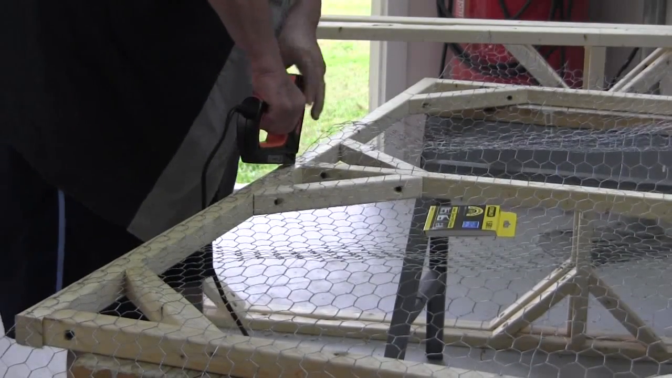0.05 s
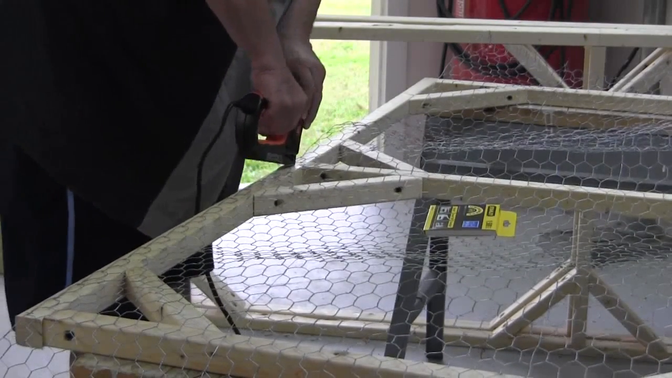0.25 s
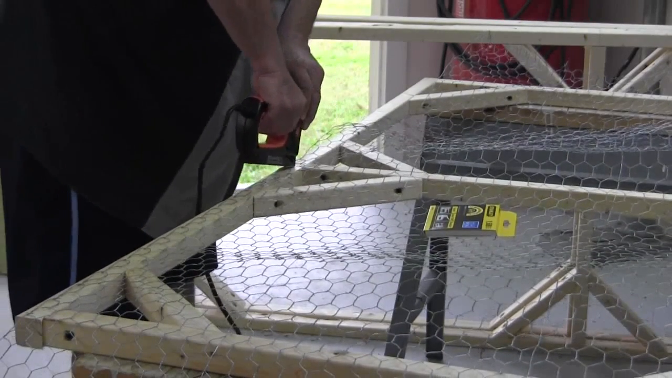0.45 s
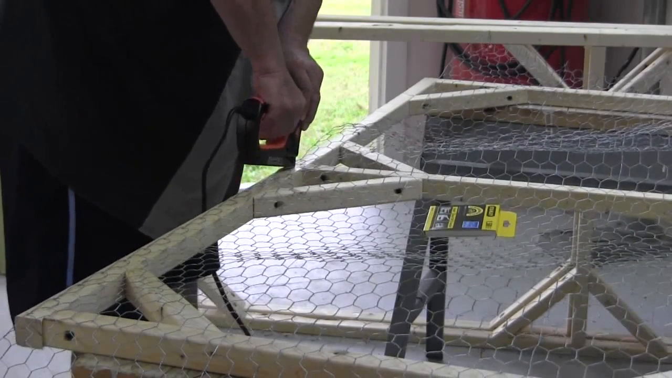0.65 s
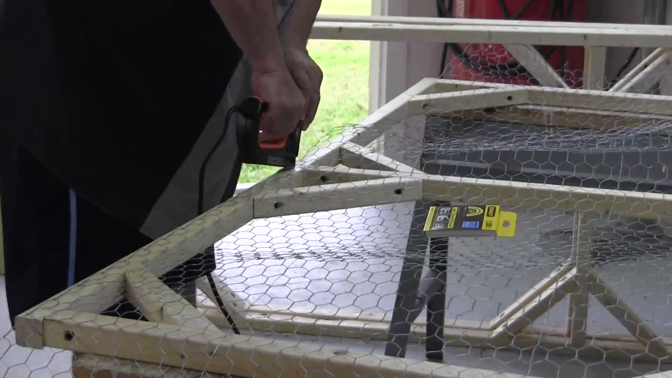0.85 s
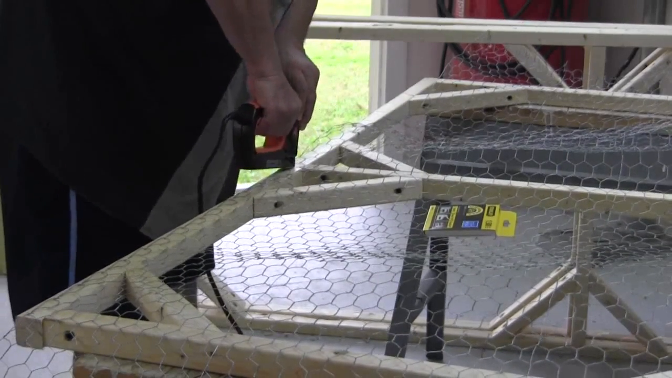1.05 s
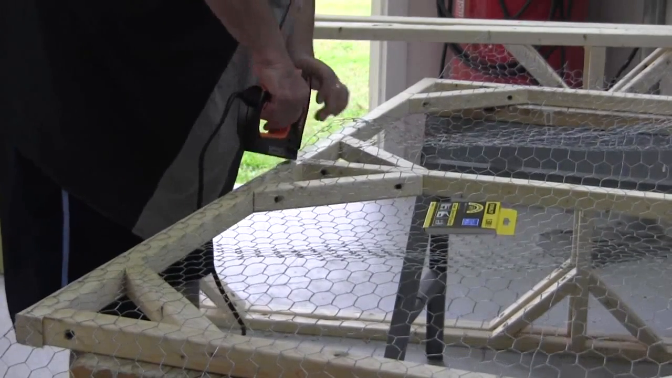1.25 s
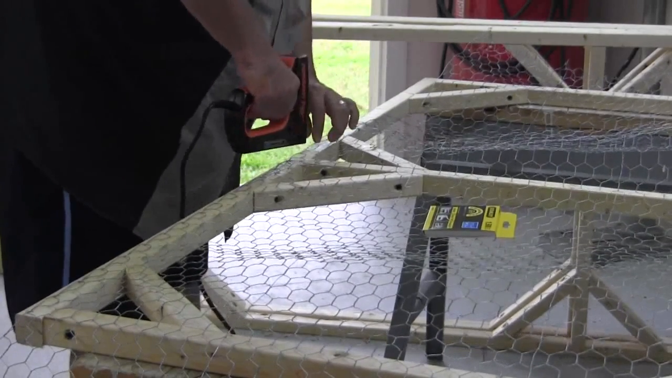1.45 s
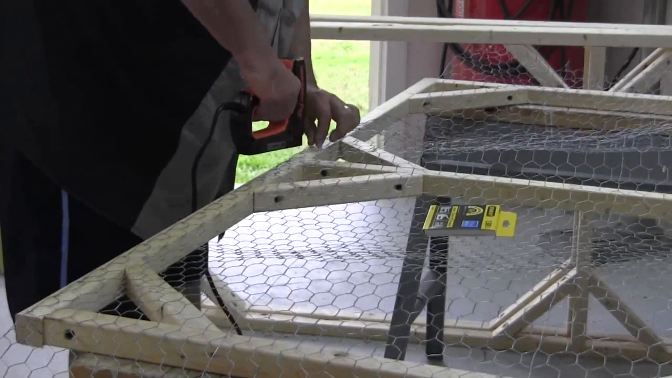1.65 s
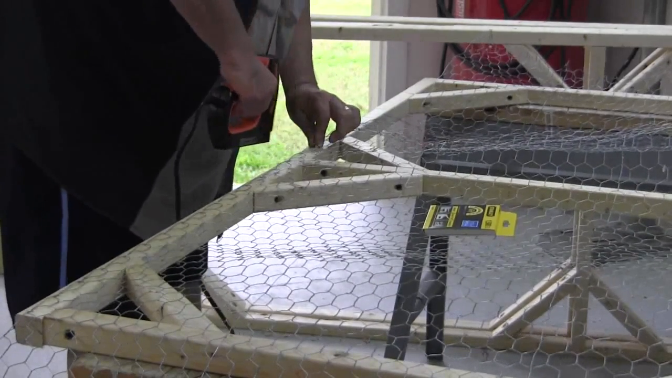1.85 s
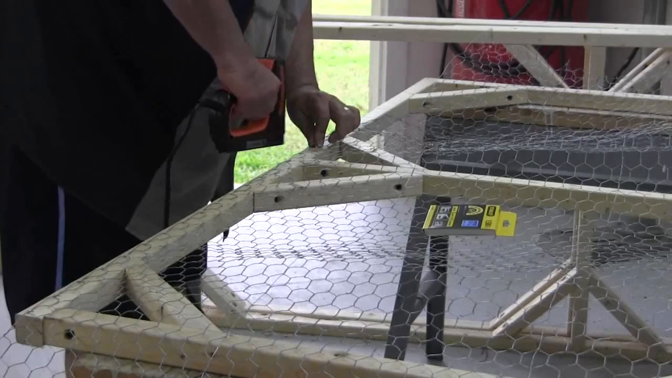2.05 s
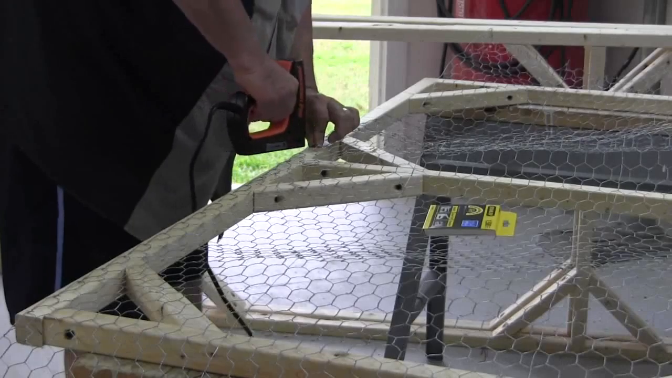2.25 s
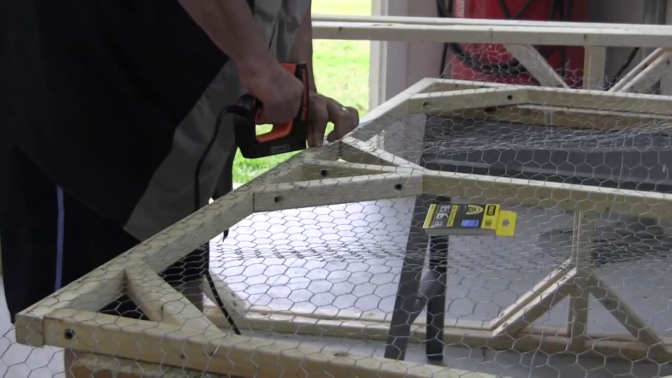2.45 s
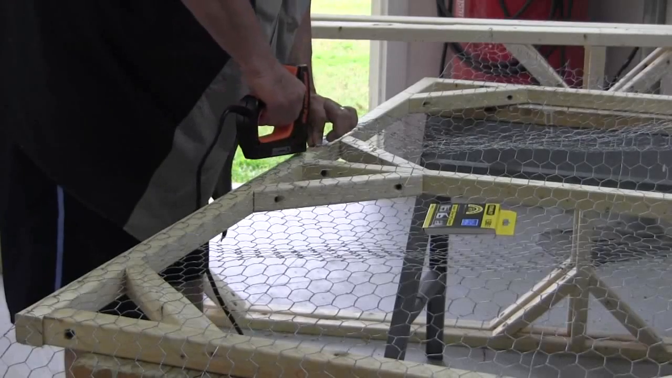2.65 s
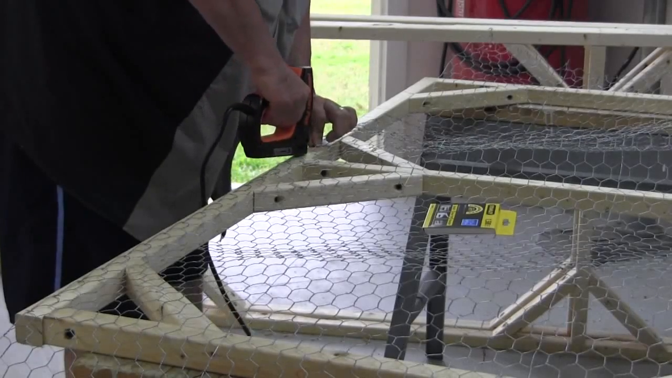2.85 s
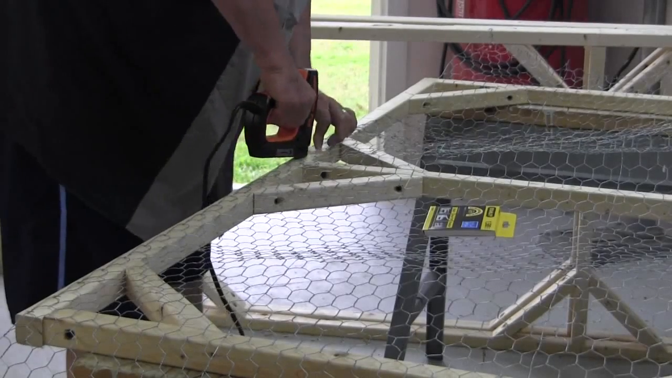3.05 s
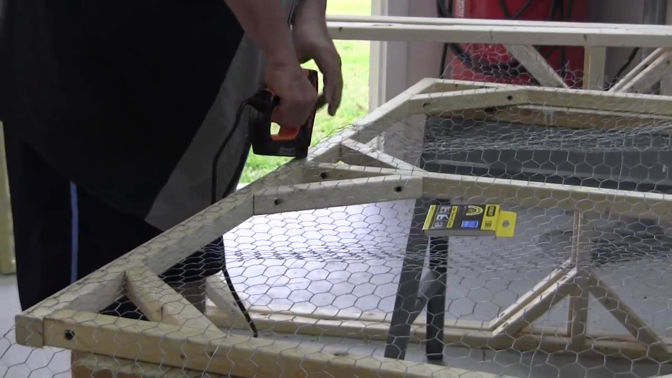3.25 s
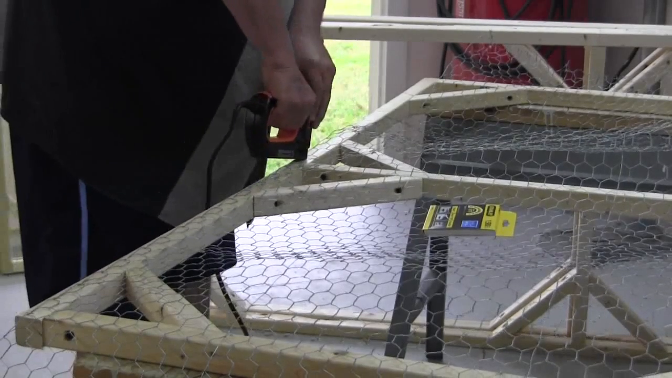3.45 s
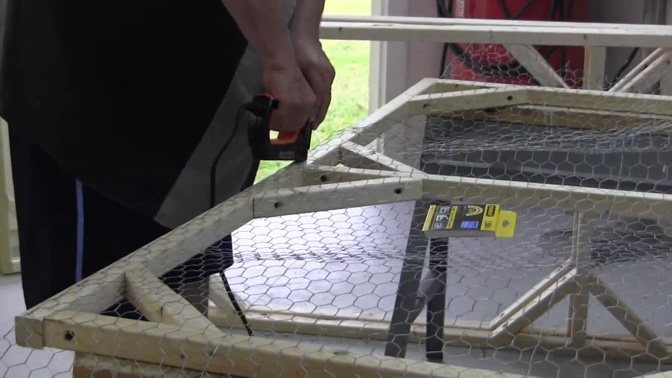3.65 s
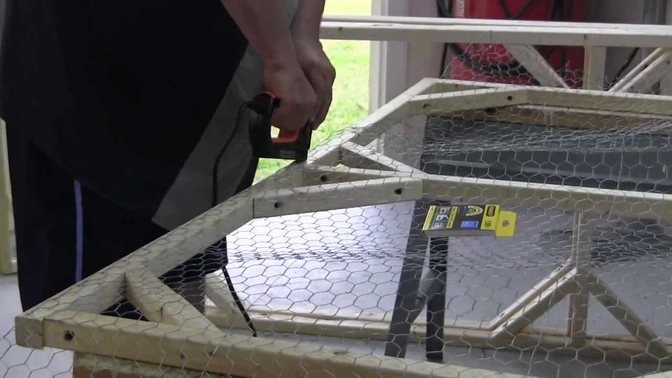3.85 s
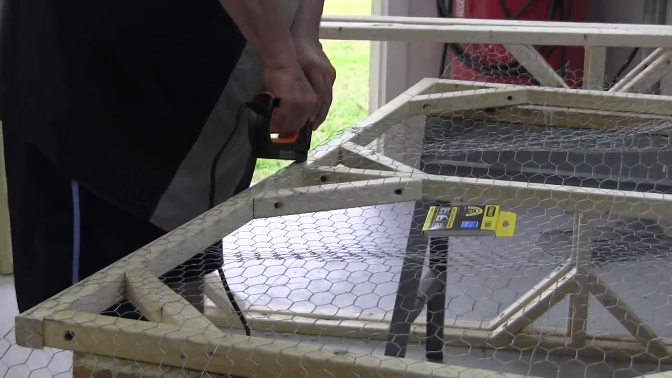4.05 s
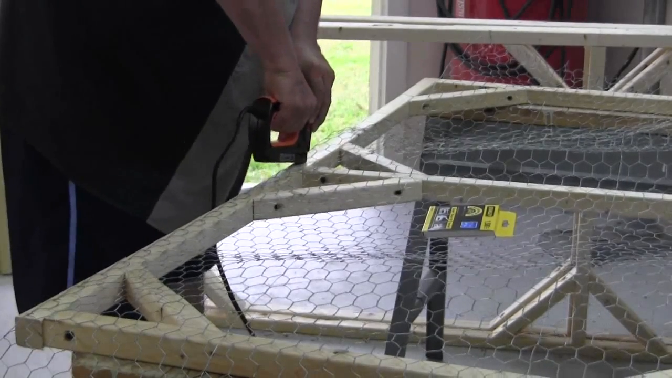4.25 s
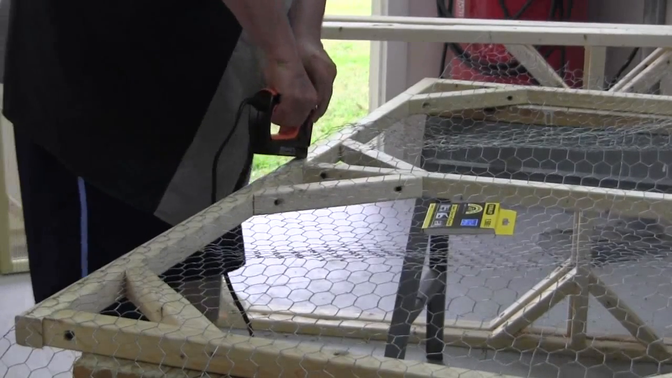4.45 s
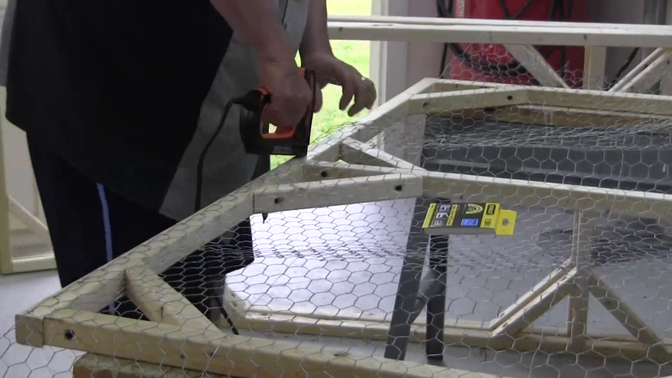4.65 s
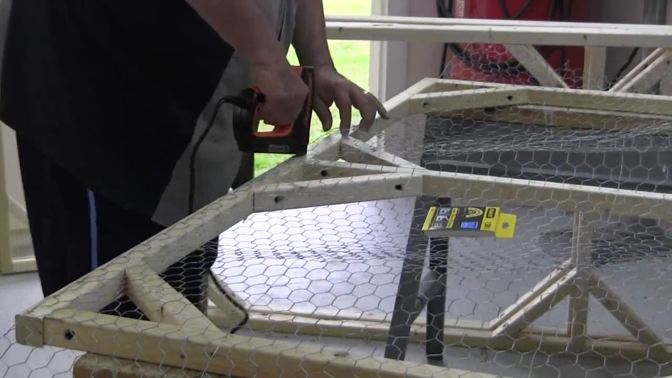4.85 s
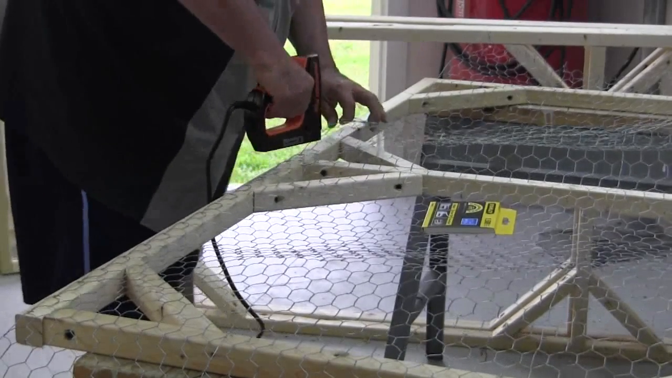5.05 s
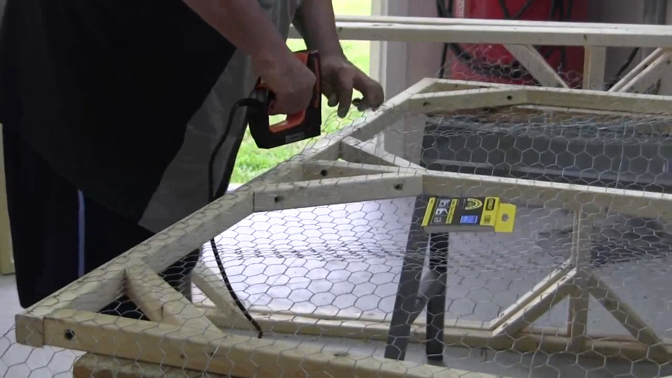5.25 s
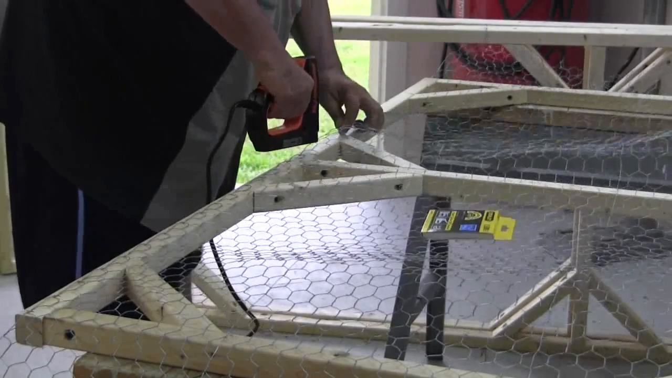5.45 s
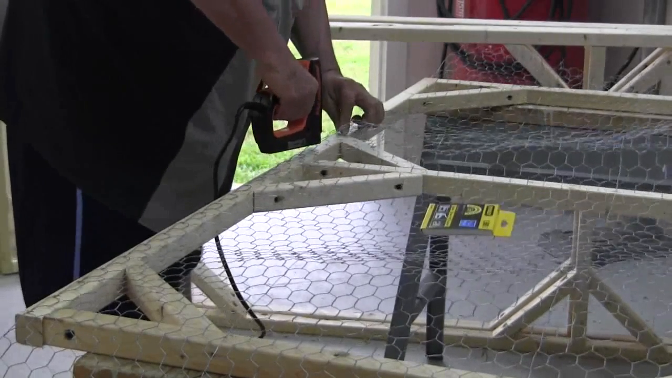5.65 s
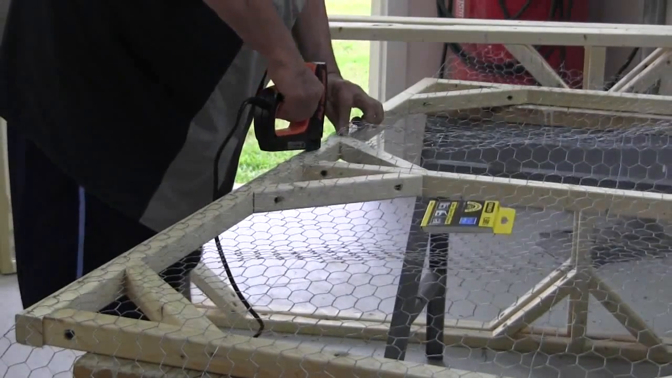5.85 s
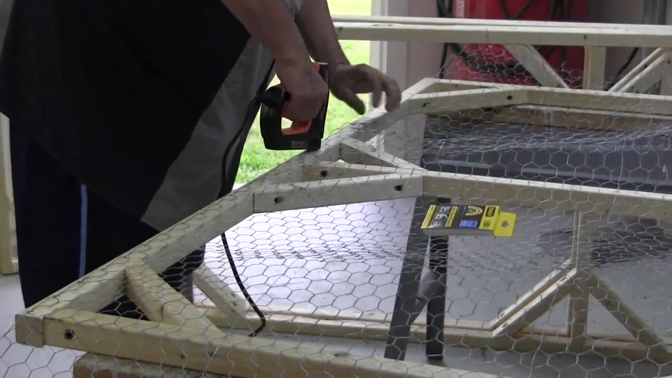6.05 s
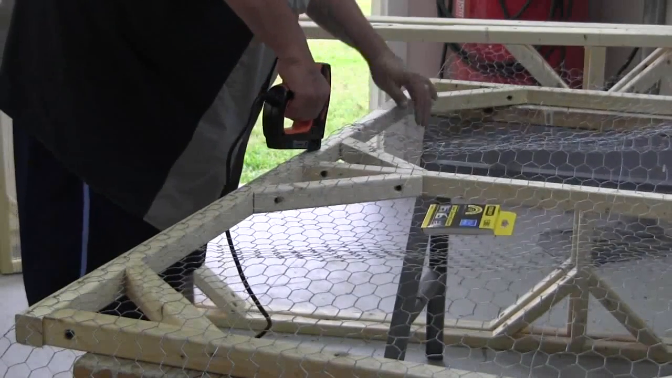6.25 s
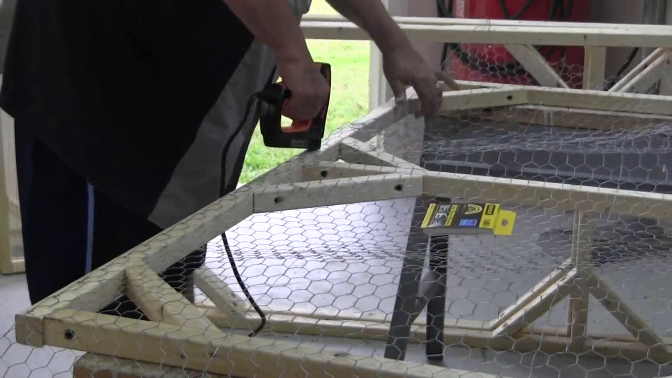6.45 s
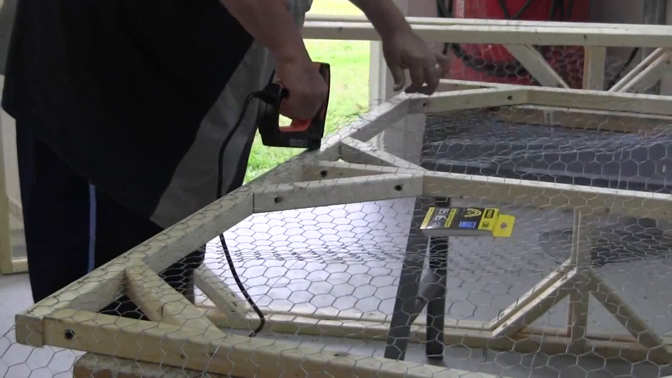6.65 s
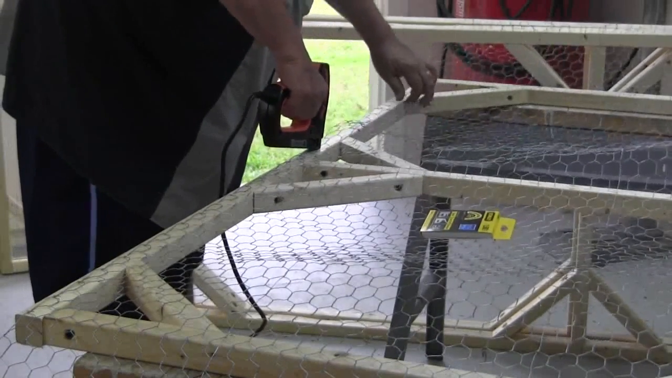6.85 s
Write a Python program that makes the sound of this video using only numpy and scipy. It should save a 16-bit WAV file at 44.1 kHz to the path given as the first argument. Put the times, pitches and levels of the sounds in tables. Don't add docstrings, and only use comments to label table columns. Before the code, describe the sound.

Electric staple gun slams two staples into a mesh-covered wooden frame in an echoing garage, with bumps, wire rubbing and creaks between.

```python
import sys
import numpy as np
from scipy import signal
from scipy.fft import rfft, irfft
from scipy.io import wavfile
from scipy.ndimage import uniform_filter1d

SR = 44100
rng = np.random.default_rng(int(sys.argv[2]) if len(sys.argv) > 2 else 0)


def to_wav(sig):
    pcm = np.clip(np.atleast_2d(sig), -1, 1) * 32767
    pcm = np.round(pcm).astype(np.int16)
    wavfile.write(sys.argv[1], SR, pcm.T)


def nominal_scale(level):
    x = np.asarray(level, float) / 20
    return 10 ** x


N = 305172


def read(points, hz):
    point_hz, value = np.transpose(points)
    return np.interp(np.log(hz + 1), np.log(point_hz + 1), value)


def evened(x):
    return x / np.sqrt(np.mean(x ** 2) + 1e-20)


def add(mix, start_s, sound):
    part = mix[..., round(start_s * SR):][..., :sound.shape[-1]]
    part += sound[..., :part.shape[-1]]


def coloured(x, gain):
    size = x.shape[-1]
    return irfft(rfft(x) * gain(np.fft.rfftfreq(size, 1 / SR)), size)


def hump(hz, centre_hz, octaves):
    return np.exp(-(np.log2((hz + 1) / centre_hz) / octaves) ** 2 / 2)


def ring(modes, size):
    t = np.arange(size) / SR
    return sum(nominal_scale(db - 60 * t / t60) * np.sin(2 * np.pi * hz * t) for hz, db, t60 in modes)


def field(frames, same_table):
    hz = np.fft.rfftfreq(512, 1 / SR)
    a, b, c, d = rng.standard_normal((frames, 257, 4)).T
    same = np.clip(read(same_table, hz), 0, 1)[:, None]
    alike = np.sqrt((1 + same) / 2) * (a + 1j * b)
    apart = np.sqrt((1 - same) / 2) * (c + 1j * d)
    return hz, np.array([alike + apart, alike - apart])


# pitch_hz, level_db per Hz
WASH = [(18, -46), (30, -14), (59, 0), (165, -3.5), (252, -9.5), (437, -15.5), (740, -11), (1130, -9),
        (2010, -15.5), (2680, -17.5), (3140, -23.5), (13300, -39.5), (16000, -39)]
# pitch_hz, left-right likeness (0-1)
WASH_LIKENESS = [(60, 1), (180, 0.96), (550, 0.79), (1650, 0.96), (4970, 0.64), (15000, 0.56)]


def traffic_wash():
    frames = N // 128 + 8
    hz, spectra = field(frames, WASH_LIKENESS)
    patches = uniform_filter1d(rng.standard_normal((frames, 257)).T, 6, 0)
    patches = evened(uniform_filter1d(patches, 30, 1))
    noise = signal.istft(spectra * nominal_scale(0.84 * patches), nperseg=512, noverlap=384)[1][:, :N]
    return nominal_scale(-47.5) * evened(coloured(noise, lambda hz: nominal_scale(read(WASH, hz))))


# pitch_hz, t60_s
GARAGE_DECAY = [(60, 0.96), (200, 0.64), (500, 0.51), (1500, 0.49), (4000, 0.44), (9000, 0.45),
                (15000, 0.32)]
# pitch_hz, left-right likeness (0-1)
ECHO_LIKENESS = [(60, 1), (240, 0.97), (950, 0.92), (3770, 0.81), (15000, 0.56)]


def garage(colour):
    hz, spectra = field(317, ECHO_LIKENESS)
    fall_db = -60 * np.arange(317) * 128 / SR / read(GARAGE_DECAY, hz)[:, None]
    linger = nominal_scale(-42.0 + 0.15 * fall_db) * np.sqrt(np.linspace(1, 0, 317))
    tail = signal.istft(spectra * (nominal_scale(fall_db) + linger), nperseg=512, noverlap=384)[1]
    size = tail.shape[1]
    tail = coloured(np.pad(tail, [(0, 0), (0, 57600 - size)]), colour)[:, :size]
    tail = tail * np.clip(np.arange(size) / SR / 0.0098, 0, 1)
    return tail / np.linalg.norm(tail[0])


# pitch_hz, width_hz, level_db
FRAME = [(155.6, 15, 8.5), (209.7, 35, 9), (281, 24, 5), (354.2, 4.4, 14), (431, 15, 5.5), (499, 6, 6),
         (559, 99, 2), (820, 39, 6), (1007, 6.2, -5), (1160, 20.4, 2.5), (1330, 15, 7)]


def woody(hz):
    return nominal_scale(sum(db / (1 + (2 * (hz - beam_hz) / width_hz) ** 2) for beam_hz, width_hz, db in FRAME))


def friction_clumps():
    return nominal_scale(1.6 * evened(uniform_filter1d(rng.standard_normal(N), 300)))


def friction(clumps, colour):
    return evened(coloured(rng.standard_normal(N) * clumps, colour))


def strokes(peak_s, level_db, swell_s, fade_s):
    grid = np.arange(0, N + 64, 64)
    late_s = grid[:, None] / SR - peak_s
    away = np.where(late_s < 0, -late_s / np.abs(swell_s), late_s / np.abs(fade_s))
    power = nominal_scale(level_db - 20 * away) ** 2
    return np.interp(np.arange(N), grid, np.sqrt(power.sum(1)))


# peak_s, scrape_db, hiss_db (cloth against scrape), swell_s, fade_s
RUBS = [(.002, -40, -10.5, 0.0033, 0.072), (.125, -55, -4, .05, .2), (.33, -52, -1.5, 0.43, 0.54),
        (.712, -52, -14, .12, 0.088), (1.09, -59, -18, .15, .05), (2.934, -44.5, -8.5, 0.024, 0.2),
        (3.36, -53.5, -13, 0.36, .3), (3.56, -59, 3, 0.32, 0.11), (3.6, -45, -7, 0.052, .2),
        (3.746, -44, -10.5, 0.31, 0.15), (4.136, -53.5, -5, .1, 0.21), (4.95, -30.5, -14.5, 0.27, 0.2),
        (5.312, -44, -6.5, 0.1, 0.27), (5.48, -54, -14, 0.41, 0.36), (5.622, -43, -7, 0.62, 0.093),
        (5.828, -50, -9, 0.27, 0.16), (6.0, -48.5, -7, .04, 0.13), (6.214, -38, -11, 0.0044, 0.22),
        (6.526, -51, -8, 0.17, .25), (6.77, -43.5, -7.5, 0.32, .04), (6.8, -37.5, -9.5, .04, 0.24)]


def rubs(clumps):
    hiss = friction(clumps, lambda hz: hump(hz, 3320, 1.0))
    scrape = friction(clumps, lambda hz: hump(hz, 1076, 0.77) + 0.28 * hump(hz, 2910, .2))
    peak_s, scrape_db, hiss_db, swell_s, fade_s = np.transpose(RUBS)
    return (strokes(peak_s, scrape_db, swell_s, fade_s) * scrape
            + strokes(peak_s, scrape_db + hiss_db, swell_s, fade_s) * hiss)


# peak_s, level_db, swell_s, fade_s
CREAKS = [(.1, -57.5, .2, 0.79), (.75, -74, 0.13, 0.13), (1.09, -53.5, 0.17, 0.033),
          (3.41, -55.5, 0.076, 0.33), (3.63, -44, 0.13, 0.22), (4.905, -32, .02, 0.41),
          (5.1, -38, 0.49, 0.066), (5.37, -46, 0.078, 0.29), (5.622, -46.5, .3, 0.27),
          (6.01, -40, 0.015, 0.12), (6.06, -34.5, 0.053, 0.068), (6.216, -44, .05, 0.38),
          (6.574, -49.5, 0.084, .09), (6.8, -42.5, 0.21, 0.48)]


def creaks(clumps):
    creak = friction(clumps, lambda hz: hump(hz, 350, 0.84) * woody(hz) ** 0.77 / (1 + (hz / 750) ** 6))
    return strokes(*np.transpose(CREAKS)) * creak


def contact(db, colour, t60, rise_s, wet_db):
    t = np.arange(8192) / SR
    edges = np.clip(np.minimum(t / rise_s, (t[-1] - t) / .05), 0, 1)
    burst = evened(coloured(rng.standard_normal(8192), colour)) * nominal_scale(db - 60 * t / t60) * edges
    sound = nominal_scale(wet_db) * np.linalg.norm(burst) * garage(colour)
    add(sound, 0, burst)
    return sound


# start_s, peak_db, centre_hz, spread_octaves, t60_s
BUMPS = [(.005, -37.5, 640, 0.19, 0.17), (1.4, -10.5, 940, 0.6, 0.23), (1.418, -15, 136, 1.6, 0.21),
         (3.6, -36.5, 603, 0.98, 0.33), (3.652, -38.5, 249, 0.82, 0.31), (4.6, -15.5, 148, 0.11, 0.29),
         (4.649, -6.5, 1000, 1.34, 0.11), (4.74, -20, 455, 0.081, 1), (4.747, -17, 120, 1.1, 0.13),
         (4.807, -9, 342, 0.76, 0.094), (4.845, -10, 253, 0.98, 0.04), (4.802, -25.5, 70, 0.25, 0.21),
         (4.911, -51, 1870, 0.42, 0.16), (5.06, -27.5, 420, 0.8, 0.4), (4.911, -45, 2930, .1, 0.28),
         (5.576, -28.5, 250, 1.1, 0.057), (6.002, -33.5, 417, 0.45, .4), (6.009, -34, 90, 0.65, 0.3),
         (6.089, -31, 121, 0.53, 0.2), (6.785, -30.5, 614, 0.22, 0.26), (6.79, -36, 1260, 0.18, .2),
         (6.831, -30, 293, 1, 0.099)]


def bumps(mix):
    for start_s, db, centre_hz, octaves, t60 in BUMPS:
        colour = lambda hz: hump(hz, centre_hz, octaves) * woody(hz)
        add(mix, start_s, contact(db - 5, colour, t60, rise_s=.006, wet_db=-2))


# start_s, end_s, first_hz, last_hz, level_db
BIRDS = [
    (.68, .95, 2750, 2750, -63),
    (2.2, 2.38, 2700, 2700, -60),
    (2.46, 2.68, 2700, 2690, -56),
    (3.25, 3.53, 6120, 6220, -66),
    (5.11, 5.33, 6300, 6350, -66),
    (6.45, 6.7, 6100, 6200, -65),
    (6.26, 6.4, 6700, 6700, -62),
    (.64, .88, 13300, 13300, -80),
    (.64, .88, 11600, 11600, -81),
]


def birds(mix):
    for start_s, end_s, first_hz, last_hz, db in BIRDS:
        size = round((end_s - start_s) * SR)
        waver = evened(uniform_filter1d(rng.standard_normal((2, 16000)), 250))[:, :size]
        hz = np.linspace(first_hz, last_hz, size) + 45 * waver[0]
        tone = np.sin(2 * np.pi * np.cumsum(hz) / SR)
        add(mix, start_s, nominal_scale(db + 1.9 * waver[1]) * tone * signal.windows.tukey(size, .3))


def tick(db, centre_hz, octaves, t60):
    return contact(db - 3.5, lambda hz: hump(hz, centre_hz, octaves), t60, rise_s=0.0011, wet_db=-1.3)


# start_s, peak_db, centre_hz, spread_octaves, t60_s
TICKS = [(1.165, -34, 3100, 0.12, 0.022), (1.166, -46.5, 7500, 0.57, .02), (1.395, -36, 13000, .2, .03),
         (2.933, -44.5, 4370, 0.26, 0.13), (3.356, -55, 4000, .6, .02), (3.5, -47, 5500, .6, .02),
         (3.594, -32, 1160, 0.68, 0.092), (4.432, -39, 3200, 0.25, 0.039), (4.746, -25, 12000, 1, .06),
         (4.952, -19, 1840, 0.5, 0.027), (5.063, -33, 11000, 1.3, 0.017), (5.416, -51, 7700, 0.21, 0.072),
         (5.499, -45.5, 5930, 0.26, .05), (5.535, -48, 10000, .6, .05), (5.59, -49, 7000, 0.42, 0.068),
         (5.83, -51, 6480, .5, .05), (6.0, -49, 7000, 0.65, 0.034)]


def ticks(mix):
    for start_s, *row in TICKS:
        add(mix, start_s, tick(*row))


# pitch_hz, level_db per Hz
BANG = [(59, -49), (100, -40), (271, -42), (535, 1.5), (1310, 3), (2220, -1), (2690, 6.5), (3860, -4),
        (13500, -11.5), (16000, -13)]


def slam_crack(noise, askew_noise, t):
    scrape = nominal_scale(-20 + 6000 * np.minimum(t, 0)) * (t < 0)
    bounces = [(0, -11), (.0045, -3), (.0085, -1), (.0155, -1),
               (.021, -3), (.03, -3), (.039, -4), (.048, -7)]
    slam = sum(nominal_scale(step_db - 60 * (t - s) / 0.042) * (t >= s) for s, step_db in bounces)
    rattle = evened(coloured(noise, lambda hz: nominal_scale(read(BANG, hz))))
    bright = coloured(rattle, lambda hz: 1 / (1 + (2600 / (hz + 1)) ** 4))
    weight = np.clip(.15 + t / .005, .15, 1)
    bright_gain = nominal_scale(2.5 - 160 * np.clip(t, 0, .06))
    crack = (bright_gain * bright + weight * (rattle - bright)) * (scrape + slam)
    askew = evened(coloured(askew_noise, lambda hz: hump(hz, 7500, .6)))
    return crack, nominal_scale(-14) * askew * np.std(bright) * slam


# pitch_hz, level_db, t60_s
CASING = [(2780, 10, 0.034), (1000, -37, 0.0043), (3340, -7, 0.075), (7000, -5, 0.073)]


def gun_shell(noise, t):
    blow = noise * nominal_scale(-60 * abs(t - .0045) / 0.0029) * (t > .003)
    return nominal_scale(-31) * signal.fftconvolve(blow, ring(CASING, size=3000))[:len(t)]


# pitch_hz, level_db, t60_s
BRACE = [(419, -1, 1.25), (426, -6, 1.1), (410, -10, .9), (284, -13, 1.2)]


def loose_brace(db, t):
    return nominal_scale(db) * ring(BRACE, size=len(t)) * np.clip(t / 0.016, 0, 1)


def mesh_shiver(db, noise, t):
    wires = evened(coloured(noise, lambda hz: hump(hz, 9200, 0.67)))
    return nominal_scale(db - 60 * t / 2.84) * wires * (t > 0)


# pitch_hz, level_db per Hz
BOOM = [(24, -46), (40, -22), (87, -21.5), (363, -9.5), (433, -1), (503, -3), (1150, -7.5), (1680, -10),
        (2910, -10), (12800, -29.5), (16000, -32)]


def shot(db, pan_db, shiver_db, brace_db):
    size = SR * 3 // 2
    t = np.arange(size) / SR - .005
    noise = rng.standard_normal((4, size))
    crack, askew = slam_crack(noise[0], noise[1], t)
    centre = crack + gun_shell(noise[1], t) + loose_brace(brace_db, t)
    sound = centre * nominal_scale(np.array([[pan_db / 2], [-pan_db / 2]]))
    sound = sound + mesh_shiver(shiver_db, noise[2:], t) + [[1], [-1]] * askew
    add(sound, .007, nominal_scale(30.5) * garage(lambda hz: nominal_scale(read(BOOM, hz)) * woody(hz)))
    return nominal_scale(db + 20.5) * sound


# start_s, level_db, pan_db (left over right), shiver_db, brace_db
SHOTS = [
    (1.1987, -11, 0.5, -56.5, -25),
    (4.449, -10, 0.2, -64, -45),
]


def shots(mix):
    for start_s, *row in SHOTS:
        add(mix, start_s - .005, shot(*row))


# start_s, peak_db, centre_hz, spread_octaves, t60_s
SNAGS = [
    (4.906, -30.5, 1300, 0.03, 0.43),
    (6.214, -35.5, 5000, 0.6, 0.22),
    (6.214, -36, 1580, 0.11, 0.11),
    (6.214, -36.5, 2780, 0.067, .1),
    (6.214, -38, 3560, 0.071, .1),
    (6.48, -49, 9100, .8, .03),
    (6.714, -38.5, 2500, 0.53, 0.056),
    (6.789, -38.5, 2200, 1.45, .05),
]


def snags(mix):
    for start_s, *row in SNAGS:
        add(mix, start_s, tick(*row))


def scene():
    mix = traffic_wash()
    clumps = friction_clumps()
    handling = nominal_scale(-3.5) * (rubs(clumps) + creaks(clumps))
    echo = signal.fftconvolve(handling[None], garage(np.ones_like), axes=1)[:, :N]
    bumps(mix)
    birds(mix)
    ticks(mix)
    shots(mix)
    snags(mix)
    return (mix + handling + nominal_scale(-2.0) * echo) * nominal_scale(np.array([[-.2], [.2]]))


def top_cut(x):
    return signal.sosfilt(signal.butter(12, 16950, fs=SR, output="sos"), x)


def record(dry):
    power_db = 10 * np.log10(abs(uniform_filter1d((dry ** 2).mean(0), 500)) + 1e-12)
    fall_db = np.arange(N) * 250. / SR
    over_db = np.maximum(np.maximum.accumulate(power_db + fall_db) - fall_db + 15.5, 0)
    held = dry / nominal_scale(.9 * uniform_filter1d(over_db, 400, origin=199))
    kneed = .88 * np.tanh(held / .88)
    band = coloured(kneed, lambda hz: 1 / (1 + (hz / 15600) ** 60) / np.sqrt(1 + (40 / (hz + 1)) ** 4))
    return top_cut(band)


dry = scene()
out = record(dry)
to_wav(out)
```